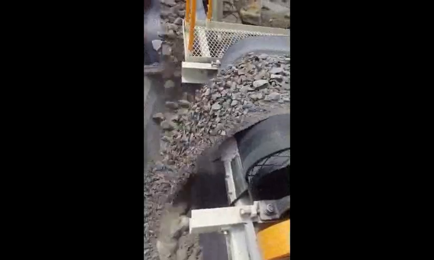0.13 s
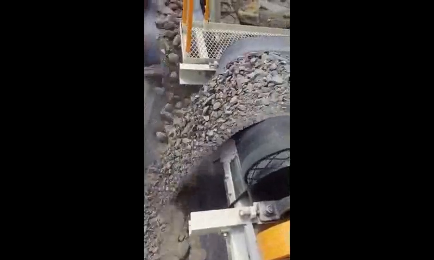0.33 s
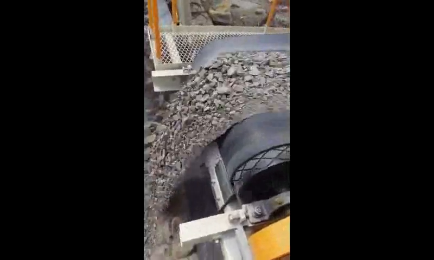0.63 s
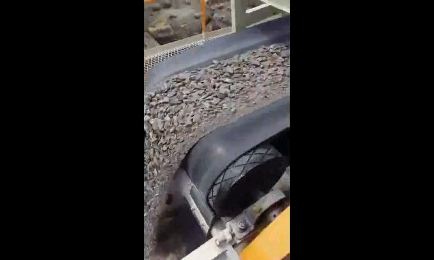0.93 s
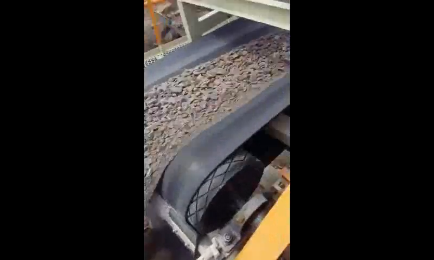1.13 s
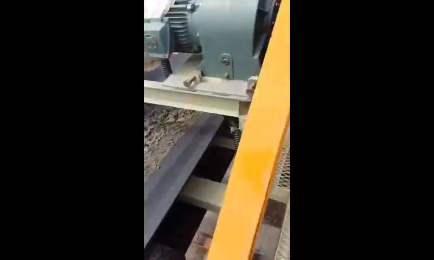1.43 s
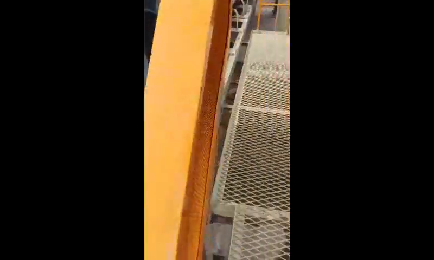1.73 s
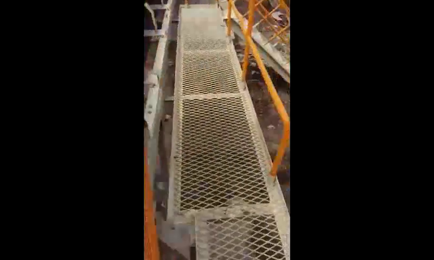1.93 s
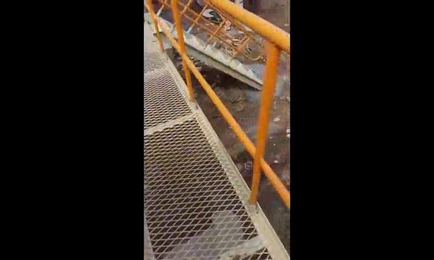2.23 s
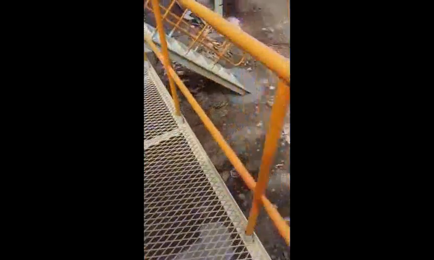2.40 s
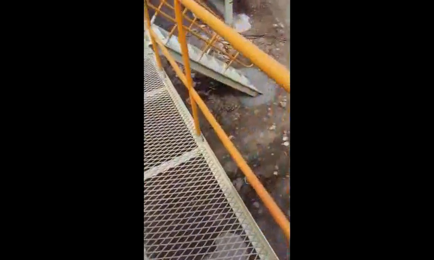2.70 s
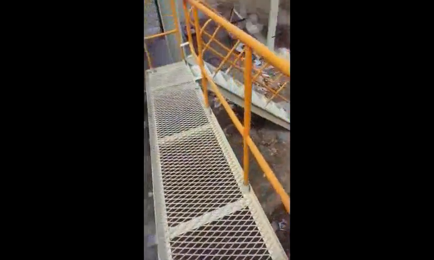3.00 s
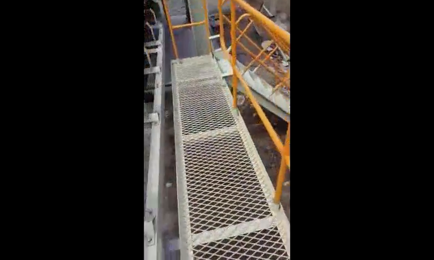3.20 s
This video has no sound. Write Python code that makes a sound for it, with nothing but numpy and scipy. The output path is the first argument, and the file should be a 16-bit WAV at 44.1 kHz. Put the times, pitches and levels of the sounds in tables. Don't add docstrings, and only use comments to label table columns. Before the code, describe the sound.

A dense, rumbling roar of belts and crusher fills an outdoor stone plant, gravel rushing faintly at first, stones knocking steel, then a rough machine whine surfacing late; close handheld mono microphone, dull treble.

```python
import sys
import numpy as np
from scipy import signal
from scipy.fft import rfft, irfft
from scipy.io import wavfile
from scipy.ndimage import uniform_filter1d, minimum_filter1d

SR = 44100
rng = np.random.default_rng(int(sys.argv[2]) if len(sys.argv) > 2 else 0)


def to_linear_factor(level_db):
    exponent = np.asarray(level_db, float) / 20
    return 10 ** exponent


def transcribe(u):
    v = np.clip(np.atleast_2d(u).T, -1, 1)
    q = np.round(v * 32767).astype(np.int16)
    wavfile.write(sys.argv[1], SR, q)


N = 147735

# time in seconds, level in dB.
BELT_LEVEL = [(0, -17), (.08, -12), (.25, -18), (.55, -13), (.8, -16), (1.05, -19), (1.3, -16.5),
              (1.62, -17), (1.75, -18.5), (1.97, -15), (2.1, -14.5), (2.27, -13.5), (2.5, -17), (3.0, -16),
              (3.35, -16)]
# frequency in Hz, strength per Hz in dB.
BELT_COLOUR = [(60, -23), (130, -5), (200, 1), (350, -0.45), (600, -7.5), (1000, -14), (2500, -18.5)]
# time in seconds, level in dB.
HUM_LEVEL = [(0.0, -22.5), (0.18, -26), (0.3, -25), (0.39, -47), (0.47, -21.5), (0.82, -26), (0.95, -34.5),
             (2.41, -20), (2.59, -33), (3.35, -27.5)]
HUM_HZ, HUM_WIDTH_HZ = 236.6, 5.0
# time in seconds, level in dB.
CRUSHER_LEVEL = [(0, -26), (.1, -16), (.2, -22.5), (.36, -18), (.5, -24.5), (.62, -21), (1.0, -30.5),
                 (1.5, -31.5), (2.1, -24), (2.25, -25.5), (2.5, -30.5), (2.78, -23), (3.1, -25),
                 (3.35, -26)]
# frequency in Hz, strength per Hz in dB.
CRUSHER_COLOUR = [(25, -30), (45, -10), (55, -13), (72, -2.5), (110, -0.9), (170, -6.5), (300, -25)]
# time in seconds, level in dB.
CHUTE_LEVEL = [(0, -20), (.12, -19.5), (.3, -19.5), (.55, -20), (.7, -23), (.87, -20.5), (1.0, -25.5),
               (1.3, -20.5), (1.52, -25.5), (1.72, -17.5), (2.0, -20), (2.4, -19.5), (2.8, -18),
               (3.2, -17.5), (3.35, -14.5)]
# frequency in Hz, strength per Hz in dB.
CHUTE_COLOUR = [(300, -17), (600, 0), (900, 1.4), (1150, -1), (1500, 0), (2250, -1), (2950, -11.5),
                (7000, -42.5)]
CLATTER_PER_S, CLATTER_DB, CLATTER_CYCLES, CLATTER_SPREAD_DB = 500, -3.5, 26, 3.27
# time in seconds, level in dB.
FAN_LEVEL = [(0, -39.5), (.65, -35.5), (.85, -31), (1.1, -28), (1.25, -35), (1.35, -31.5), (1.52, -32),
             (1.62, -27.5), (1.9, -29.5), (2.4, -36), (2.7, -32.5), (3.1, -34), (3.35, -30)]
# frequency in Hz, strength per Hz in dB.
FAN_COLOUR = [(3000, -14), (3500, -5), (3950, 2.1), (4400, -1), (5200, -7), (6500, -17), (11500, -40.5)]
# time in seconds, level in dB.
FALL_LEVEL = [(0, -39), (.12, -35.5), (.22, -35), (.31, -41), (.37, -32), (.48, -36), (.6, -43.5),
              (.88, -41.5), (1.4, -47), (1.62, -50), (1.8, -49), (2.4, -48), (3.35, -56)]
# frequency in Hz, strength per Hz in dB.
FALL_COLOUR = [(2100, -20), (4600, 4.2), (6100, 0.5), (7350, -3), (8200, -4.5), (9400, -15), (11500, -18)]
GRIT_PER_S, GRIT_DB, GRIT_CYCLES, GRIT_SPREAD_DB = 950, -1.5, 10.5, 3.0
# time in seconds, centre in Hz, level in dB.
MOUTH_PATH = [(0, 1900, -31), (.33, 1566, -25), (0.501, 1612, -21), (.62, 1985, -54), (0.851, 2200, -35),
              (1.1, 2108, -39), (1.45, 1993, -28), (1.6, 2017, -19.5), (1.72, 1450, -20.5),
              (1.87, 2205, -20), (2.03, 2105, -30.5), (2.25, 2002, -17.5), (2.48, 1648, -25.5),
              (2.7, 1455, -20.5), (2.899, 1593, -27.5), (3.35, 1606, -32)]
MOUTH_WIDTH_HZ, MOUTH_KNOCKS_PER_S, MOUTH_SPREAD_DB = 610, 1500, 3.3
# start in seconds, length in seconds, level in dB, pitch in Hz.
BOOMS = [
    (0.037, 0.15, -19, 85.4),
    (1.206, 0.11, -22.5, 328.5),
    (1.421, 0.11, -20.5, 301),
    (1.57, 0.11, -20, 395),
    (1.902, .14, -18, 340),
    (2.179, .2, -19, 195),
    (2.55, 0.096, -19.5, 381),
]
BOOM_WIDTH_HZ = 37
# start in seconds, peak in dB, pitch in Hz,
# time to fade by 60 dB in seconds.
CLINKS = [(.325, -19, 1520, .04), (.355, -15, 7300, 0.027), (.404, -22, 3350, 0.065),
          (.432, -17, 7030, .021), (0.483, -15, 3250, 0.035), (.530, -8.5, 1560, 0.067),
          (.594, -17.5, 3320, 0.088), (.703, -20, 3220, 0.064), (.825, -29, 3760, 0.25),
          (.835, -13, 2040, 0.091), (1.150, -31, 2270, 0.09), (1.225, -27, 3060, 0.097),
          (1.595, -11, 2106, .09), (1.615, -30.5, 3080, 0.044), (1.70, -9, 1343, 0.081),
          (2.405, -29, 4800, .051), (2.690, -20, 4000, 0.087)]
# time in seconds, level in dB.
WHINE_LEVEL = [(0, -49), (2.2, -44.5), (2.45, -20.5), (2.6, -29), (2.9, -25.5), (3.35, -32.5)]
# pitch in Hz, width in Hz, level in dB.
WHINE_LINES = [(830, 25, 0), (1355, 40, -4), (1680, 18, -1)]
# start in seconds, length in seconds, level in dB, pitch in Hz.
SQUEAKS = [
    (2.645, .11, -47, 9200),
    (2.992, 0.056, -48, 9180),
]

MIC_CUT_HZ = 54
LIMIT, LIMITER_SAMPLES = 0.97, 261


def rms_one(x):
    return x / np.sqrt(np.mean(x ** 2) + 1e-20)


def level(rows):
    s, db = np.transpose(rows)
    return to_linear_factor(np.interp(np.arange(N) / SR, s, db))


def at_hz(colour, hz):
    f, db = np.transpose(colour)
    octaves_beyond = np.abs(np.log2(hz / np.clip(hz, f[0], f[-1])))
    return np.interp(np.log(hz), np.log(f), db) - 24 * octaves_beyond


def drift(rate_hz):
    step = 40
    r = np.exp(-2 * np.pi * rate_hz * step / SR)
    noise = rng.standard_normal(N // step + 2002)
    slow = signal.lfilter([1], [1, -2 * r, r * r], noise)[2000:]
    return np.interp(np.arange(N) / step, np.arange(len(slow)), rms_one(slow))


def ring(x, hz, t60):
    r = to_linear_factor(-60 / (t60 * SR))
    w = 2 * np.pi * hz / SR
    return signal.lfilter([0, np.sin(w)], [1, -2 * r * np.cos(w), r * r], x + 1e-18)


def roar(colour, shared_db, own_db, rate):
    hz = np.arange(N // 2 + 1) * SR / N + 1e-9
    spectrum = rfft(rng.standard_normal(N)) * to_linear_factor(at_hz(colour, hz))
    together = drift(rate)
    out = np.zeros(N)
    for centre in 30 * 2 ** np.arange(0, 8.8, 0.4):
        share = np.clip(1 - np.abs(np.log2(hz / centre)) / 0.4, 0, 1)
        swelling = to_linear_factor(shared_db * together + own_db * drift(rate))
        out += irfft(spectrum * share, N) * swelling
    return rms_one(out)


def stones(colour, low_hz, high_hz, per_s, cycles, spread_db, surge_db):
    sizes = to_linear_factor(spread_db * np.minimum(rng.exponential(1, N), 4)) * rng.choice([-1, 1], N)
    hit = rng.random(N) < per_s * to_linear_factor(surge_db * drift(8)) / SR
    pitch_number = rng.integers(0, 24, N)
    out = np.zeros(N)
    for k, hz in enumerate(np.geomspace(low_hz, high_hz, 24)):
        strikes = sizes * hit * (pitch_number == k)
        rung = rms_one(ring(strikes, hz, cycles / hz))
        out += to_linear_factor(at_hz(colour, hz)) * np.sqrt(hz) * rung
    return rms_one(out)


def tone(hz, width_hz, steady):
    t60 = np.log(1000) / np.pi / width_hz
    noise = ring(rng.standard_normal(N + SR), hz, t60)[SR:]
    sine = np.sin(2 * np.pi * hz * np.arange(N) / SR)
    return np.sqrt(2 * steady) * sine + np.sqrt(1 - steady) * rms_one(noise)


def swell(start, length):
    t = np.arange(N) / SR
    return np.sin(np.pi * np.clip((t - start) / length, 0, 1))


def belt():
    return level(BELT_LEVEL) * roar(BELT_COLOUR, shared_db=1.44, own_db=0.7, rate=6.0)


def gear_hum():
    return level(HUM_LEVEL) * tone(HUM_HZ, HUM_WIDTH_HZ, steady=0.89)


def crusher():
    return level(CRUSHER_LEVEL) * roar(CRUSHER_COLOUR, shared_db=3.0, own_db=3.1, rate=6.3)


def chute():
    blur = roar(CHUTE_COLOUR, shared_db=0.9, own_db=2.0, rate=14.0)
    clatter = stones(CHUTE_COLOUR, 647, 3470, CLATTER_PER_S, CLATTER_CYCLES, CLATTER_SPREAD_DB, surge_db=3.5)
    return level(CHUTE_LEVEL) * (to_linear_factor(0.5) * blur + to_linear_factor(CLATTER_DB) * clatter)


def fan():
    return level(FAN_LEVEL) * roar(FAN_COLOUR, shared_db=1.24, own_db=2.3, rate=21.0)


def falling_gravel():
    rush = roar(FALL_COLOUR, shared_db=3.0, own_db=0.6, rate=28.0)
    grit = stones(FALL_COLOUR, 2800, 9800, GRIT_PER_S, GRIT_CYCLES, GRIT_SPREAD_DB, surge_db=2.0)
    return level(FALL_LEVEL) * (to_linear_factor(1.5) * rush + to_linear_factor(GRIT_DB) * grit)


def chute_mouth():
    s, hz, db = np.transpose(MOUTH_PATH)
    t = np.arange(N) / SR
    sizes = to_linear_factor(MOUTH_SPREAD_DB * np.minimum(rng.exponential(1, N), 4))
    knocks = sizes * (rng.random(N) < MOUTH_KNOCKS_PER_S / SR)
    knocks = knocks * np.exp(2j * np.pi * rng.random(N))
    width_filter = signal.butter(2, MOUTH_WIDTH_HZ / 2, fs=SR, output="sos")
    rung = signal.sosfilt(width_filter, knocks)
    carrier = np.exp(2j * np.pi * np.cumsum(np.interp(t, s, hz)) / SR)
    return to_linear_factor(np.interp(t, s, db)) * rms_one(np.real(rung * carrier))


def booms():
    out = np.zeros(N)
    for start, length, db, hz in BOOMS:
        out += to_linear_factor(db) * swell(start, length) * tone(hz, BOOM_WIDTH_HZ, steady=0.55)
    return out


def clinks():
    t = np.arange(N) / SR
    out = np.zeros(N)
    for start, db, hz, t60 in CLINKS:
        age = np.maximum(t - start, 0)
        attack = 1 - np.exp(-age / 0.002)
        out += to_linear_factor(db - 60 * age / t60) * attack * np.sin(2 * np.pi * hz * age)
    return out


def whine():
    notes = np.zeros(N)
    for hz, width_hz, db in WHINE_LINES:
        notes += to_linear_factor(db) * tone(hz, width_hz, steady=0.3)
    return level(WHINE_LEVEL) * notes


def squeaks():
    out = np.zeros(N)
    for start, length, db, hz in SQUEAKS:
        out += to_linear_factor(db) * swell(start, length) * tone(hz, 150, steady=0.11)
    return out


def scene():
    machines = belt() + gear_hum() + crusher() + fan() + whine() + squeaks()
    stone = chute() + falling_gravel() + chute_mouth() + booms() + clinks()
    return (machines + stone)[None]


def top_cut(x):
    return signal.sosfilt(signal.butter(12, 11400, fs=SR, output="sos"), x)


def record(dry):
    bass_cut = signal.butter(2, MIC_CUT_HZ, "high", fs=SR, output="sos")
    cut = signal.sosfilt(bass_cut, dry)
    safe_gain = np.minimum(1, LIMIT / (np.abs(cut) + 1e-9))
    held_gain = minimum_filter1d(safe_gain, size=LIMITER_SAMPLES)
    mix = cut * uniform_filter1d(held_gain, size=LIMITER_SAMPLES)
    return top_cut(mix)


dry = scene()
out = record(dry)
transcribe(out)
```